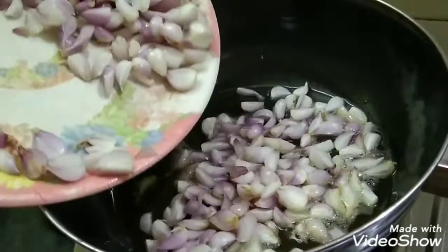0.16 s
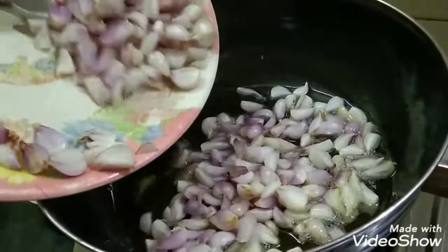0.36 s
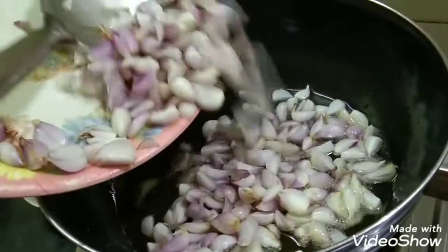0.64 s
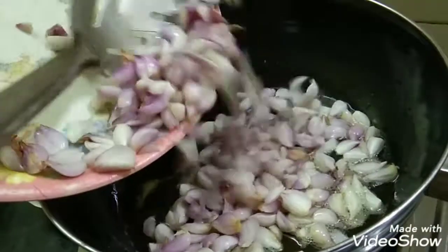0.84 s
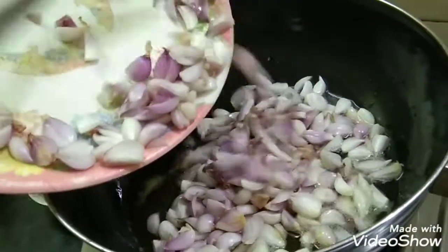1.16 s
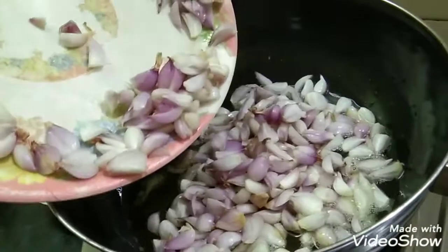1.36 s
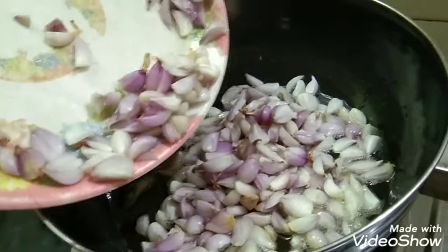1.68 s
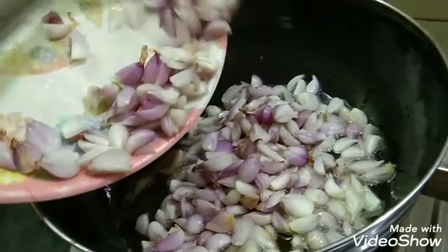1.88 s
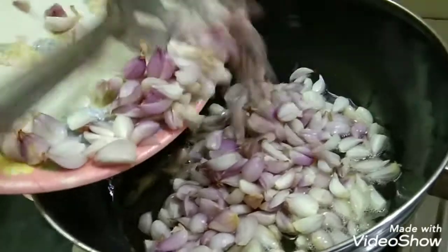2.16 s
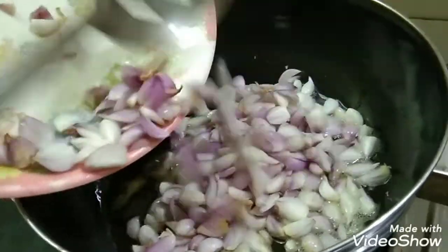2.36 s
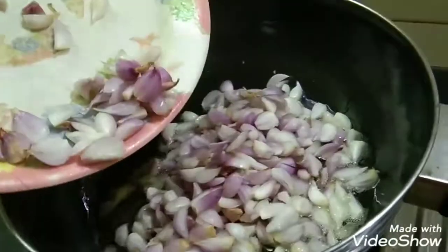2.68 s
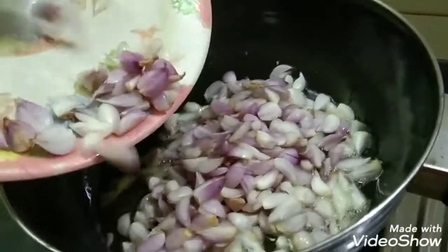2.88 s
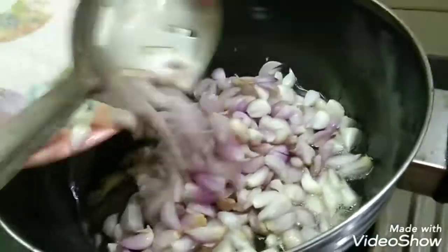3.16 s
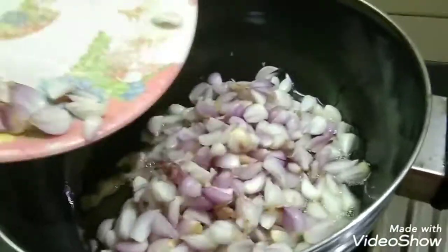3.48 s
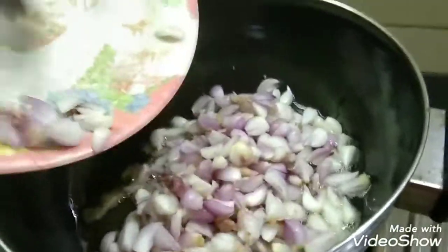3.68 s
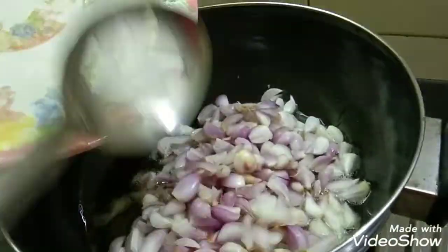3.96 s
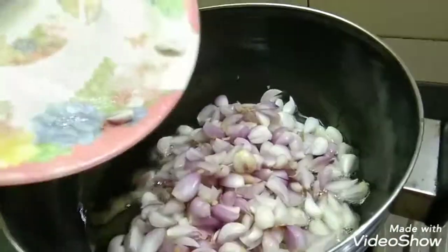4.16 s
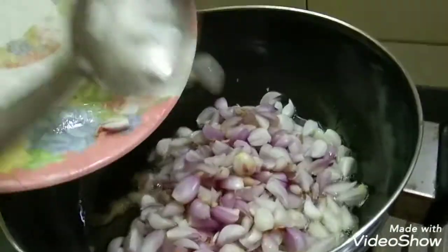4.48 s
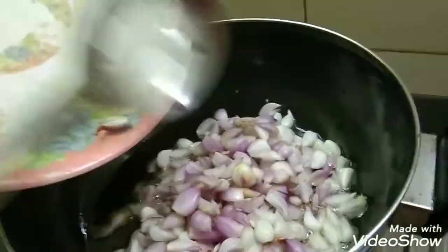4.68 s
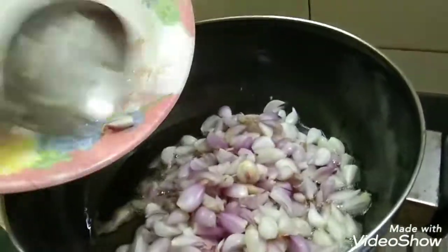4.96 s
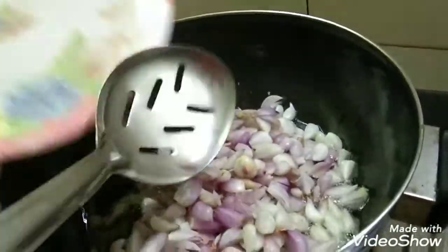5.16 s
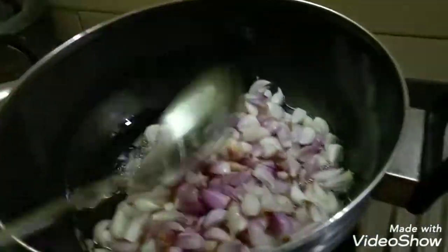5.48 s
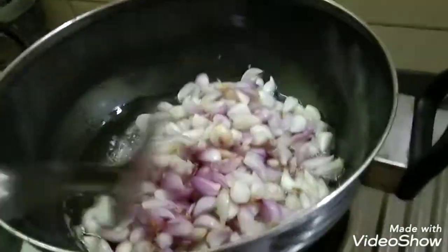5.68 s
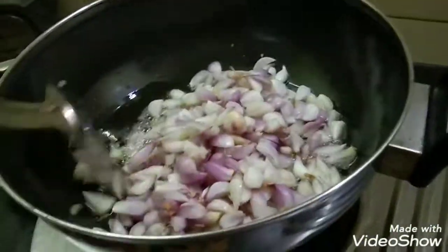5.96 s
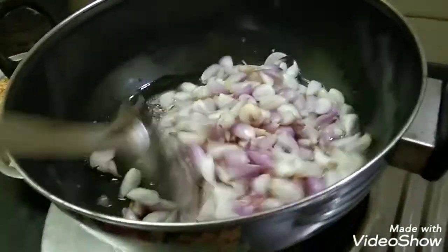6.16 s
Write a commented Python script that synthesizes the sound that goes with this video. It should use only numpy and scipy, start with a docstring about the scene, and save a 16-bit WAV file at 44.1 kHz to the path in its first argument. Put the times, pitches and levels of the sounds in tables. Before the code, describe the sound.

Hot oil crackles and snaps loudly, then gradually cools to a softer fizz. Over it come short rough scrapes and hard ringing knocks of a metal spoon on a plate, and soft wet thuds of falling onions. Near six seconds the spoon hits the wok with bright metallic rings and grinds along the bottom. Close phone pickup in a lightly reverberant kitchen with a low burner rush.

```python
"""Onions in hot oil

Chopped onions sizzle, spit and slowly calm in a wok: filtered crackle, ringing bubbles and short pops.
A steel spoon knocks (ringing modes) and scrapes (rough friction) more onions off a plate in a kitchen.
Onion pieces patter as dull clusters of contacts; at the end the spoon hits the wok and starts to stir.
A burner's rush and a faint handling rumble lie underneath, and a phone's limiter holds the peaks."""
import sys
import numpy as np
from scipy import signal
from scipy.fft import rfft, irfft, next_fast_len
from scipy.io import wavfile
from scipy.ndimage import uniform_filter1d, minimum_filter1d, map_coordinates

SR = 44100
rng = np.random.default_rng(int(sys.argv[2]) if len(sys.argv) > 2 else 0)


def dump_mix(stems):
    """Bounce the given channels to the path in sys.argv[1] as a 16-bit WAV at rate SR."""
    frames = np.atleast_2d(stems).T  # one column per channel
    limited = np.clip(frames, -1, 1)  # hard clip at full scale
    pcm = np.round(limited * 32767).astype(np.int16)
    wavfile.write(sys.argv[1], SR, pcm)


N = 278712
TIME = np.arange(N) / SR
RING_TIME = np.arange(SR // 2) / SR

# Levels in the tables are fader settings: the layers trim them further in the mix.
# Set bursts of steam, and at 4.417 s a pop-like tick, probably of the spoon:
# t/s, peak level/dB, ringing f/Hz, splash level against the peak/dB
POP_EVENTS = [(0.04, -3, 5460, -11), (0.0624, -9, 6740, -26), (0.0715, -5, 6600, -26),
              (0.0977, -7.5, 6720, -21), (0.19, -11.5, 4700, -11), (0.2489, -4, 5700, -22),
              (0.2609, -12, 5460, -9), (0.2768, -7.5, 6250, 0), (0.471, -9.5, 6640, -24),
              (0.5432, -1.5, 5360, -33), (0.6716, -8, 2980, -8), (0.7753, -10, 6640, -16),
              (0.9583, -8.5, 6170, -23), (1.1322, -12, 6640, -29), (1.234, -11.5, 6800, -21),
              (1.288, -9.5, 6400, -6), (1.3149, -10, 6830, -26), (1.5534, -9, 7200, -22),
              (1.9189, -1.5, 5970, -20), (2.1264, -7.5, 6800, -34), (2.3321, -13, 4480, -28),
              (2.6231, -11, 5740, -19), (2.7197, -11, 7030, -43), (2.7886, -12, 6700, -27),
              (2.816, -7.5, 6600, -23), (3.2188, -7, 6700, -33), (3.3219, -9.5, 6460, -17),
              (3.3841, -6.5, 6250, -11.5), (3.496, -14.5, 6500, -37), (3.91, -14, 6250, -36),
              (4.1857, -12, 6350, 2), (4.4173, -8.5, 6130, 8), (5.1639, -15.5, 6640, -39),
              (5.3662, -21, 6430, -22)]
# Spoon strikes on the plate: t/s, clash level/dB, spoon ring level/dB, plate ring level/dB,
# thump level/dB, place (0 middle, 1 rim), chatter/s, clash t60/s
PLATE_KNOCKS = [(1.573, -19.5, -34, -26.5, -28, 1, .001, 0.053),
                (2.771, -21, -25.5, -24.5, -27, 0.28, .002, 0.12),
                (3.038, -38, -30, -44, -48, 0.38, 0.012, 0.062),
                (3.581, -16.5, -29.5, -20.5, -18.5, 0.96, 0.011, 0.075),
                (4.302, -20.5, -32, -20.5, -40, .05, 0.016, 0.078),
                (4.497, -14.5, -23, -46, -49, 0.87, 0.0043, 0.061),
                (4.919, -22, -42, -28.5, -25, 0.86, .003, 0.034)]
# Spoon slides over the plate: start t/s, length/s, rub level/dB, plate ring level/dB, squeal level/dB
PLATE_SCRAPES = [(0.477, 0.055, -25.5, -33, -42), (1.647, 0.16, -31, -42.5, -38),
                 (1.692, 0.045, -40.5, -44.5, -31.5), (2.145, 0.028, -24, -50, -40),
                 (2.821, 0.16, -36.5, -46, -46), (3.034, 0.058, -28.5, -60, -31),
                 (3.769, 0.02, -29.5, -44, -50), (3.819, 0.025, -26, -47, -36),
                 (4.38, 0.12, -38.5, -54, -51), (5.007, 0.018, -28, -30, -38),
                 (5.038, 0.061, -29, -59, -41)]
# Onion pieces landing or tumbling on the heap: start t/s, length/s, level/dB, f/Hz
ONION_LANDINGS = [(0.686, 0.062, -43.5, 737), (0.793, 0.14, -48.5, 755), (1.0, .25, -58, 370),
                  (1.419, 0.014, -35.5, 826), (1.658, 0.013, -39.5, 860), (2.153, 0.083, -54.5, 695),
                  (5.806, 0.031, -39.5, 630), (6.099, 0.29, -44.5, 786)]
# Spoon blows on the wok: t/s, clash level/dB, ring level/dB, thump level/dB, chatter/s
WOK_HITS = [(5.813, -32.5, -32, -44, 0.0046), (5.871, -19.5, -18.5, -50, 0.026),
            (6.305, -31.5, -29.5, -24, 0.014)]
# Loudness curve of the spoon pushing through the wok: t/s, level/dB
STIR_LEVELS = [(5.97, -11), (5.982, -33), (5.992, -29), (6.044, -24.5), (6.14, -29.5), (6.32, -28)]
# Modes of the undamped plate: f/Hz, t60/s, level struck in the middle/dB, level struck at the rim/dB
PLATE_MODES = [(321, 0.26, -2.5, -9), (364, 0.32, -6.5, -10), (402.4, 0.36, -19, -13.5),
               (496, 0.21, -12.5, -11), (578, 0.1, -18, -7), (705, 0.17, -2, -15), (761, 0.2, -3, -9),
               (894, 0.18, -6, -15), (1076, 0.25, -18, -6), (1175, 0.17, -15, -11), (1427, 0.076, -3, -5),
               (1663, 0.19, -32, -5.5), (1795, 0.1, -9, 2), (1910, 0.1, 4.5, -4), (1952, 0.13, -31, 5),
               (2155, 0.078, -29, 3), (2276, 0.06, 1, 3), (2550, 0.032, 9, -16), (3050, 0.058, -35, 11.5),
               (3355, 0.09, 5, -23), (3670, 0.093, -50, 4), (4500, 0.15, -29, -20), (4414, 0.1, -14, 3.5)]
# Modes of the steel spoon: f/Hz, t60/s, level/dB
SPOON_MODES = [(286, .2, -11), (1945, .15, -16), (3402, .16, -7), (3470, .15, -11), (6083, .22, -5),
               (6578, .22, -2), (6725, .16, -2), (6800, .16, -3), (7117, .2, -7), (7347, .22, -1),
               (7865, .2, -11), (8520, .15, -27)]
# Modes of the wok: f/Hz, t60/s, level/dB
WOK_MODES = [(379, 0.22, -10), (443.3, 0.61, -17), (560, 0.11, -12), (760, .12, -11), (883, 0.15, -10),
             (2060, .15, -14), (2900, .05, -19), (3265, 0.036, 2), (4240, 0.087, -10), (4820, .1, -2),
             (5390, 0.14, -2.5), (6080, 0.17, 2.5), (6300, 0.16, 2.5), (6800, .15, -0.5), (6540, 0.11, 2.5),
             (7360, 0.18, -0.5)]
# Colour of the sizzling oil: f/Hz, level/dB
SIZZLE_COLOUR = [(710, -22.5), (1200, -22.5), (1490, -21.5), (2180, -11.5), (2400, -13.5), (2890, -1),
                 (3950, -9), (4550, -9.5), (5020, -3.5), (6800, 2.5), (7250, -1), (9210, -25),
                 (12100, -35.5), (14800, -29), (16000, -26)]
# Colour of the splash under a pop: f/Hz, level/dB
SPLASH_COLOUR = [(200, -38), (1600, -22), (2500, -4), (3000, 0), (4000, -1), (5500, -3), (7500, -16),
                 (9000, -36), (15000, -55)]
# Colour of the broad early crackle, low bubbling and crisp top: f/Hz, level/dB
HOT_CRACKLE_COLOUR = [(200, -9), (400, 3), (900, 6.5), (2500, -14), (9000, 6.5), (15000, -6.5)]
# Colour of the burner and room: f/Hz, level/dB
KITCHEN_COLOUR = [(47, -46), (80, -7.5), (186, -11), (236, -5), (264, -9), (303, 1), (343, -13),
                  (383, -3.5), (492, -18), (573, -8.5), (2200, -14.5), (2860, -47), (4840, -120)]
# Colour of the handling rumble: f/Hz, level/dB
RUMBLE_COLOUR = [(15, -29), (35, -22), (58, -3), (85, -16), (160, -19), (500, -56)]
# Colour of the spoon's rub on the plate: f/Hz, level/dB
RASP_COLOUR = [(30, -60), (100, -14.5), (400, -14.5), (1100, -10.5), (1900, -10.5), (2800, -1),
               (4200, -8.5), (6500, 8.5), (7600, 4), (9000, -14.5), (12000, -23.5), (15500, -24)]
# Colour of a steel clash: f/Hz, level/dB
CLASH_COLOUR = [(30, -56), (100, -30), (300, -16), (600, -15.5), (1100, -14), (2200, -12.5), (3000, -4),
                (4200, -9), (5500, -1.5), (6700, 3.5), (7500, 1), (8500, -12.5), (10000, -21.5),
                (12500, -29), (15500, -24)]
# Colour of the dull push in a blow: f/Hz, level/dB
THUMP_COLOUR = [(25, -55), (50, -30), (130, 1.5), (220, 0), (420, 10), (900, -19), (3000, -67)]
# Colour of the spoon grinding in the wok: f/Hz, level/dB
STIR_COLOUR = [(88, -51), (150, -26), (286, -4), (321, -21), (422, -11), (662, -14), (888, -4), (1480, -23),
               (1630, -9.5), (2500, -12), (3220, -4), (3920, -11), (6140, 0.5), (7320, -1), (16000, -70)]
# Reverberation of the walls: f/Hz, t60/s
WALL_DECAY = [(200, 0.33), (1400, 0.47), (4000, 0.31), (10000, 0.32)]

# the cold onions cool the oil, so the sizzle sinks steadily from its first reference level
FRYING_DB, COOLING_DB_PER_S = -31.5, 1.27
# fresh onions reach the oil and the sizzle flares: start, time to its height, height
FLARE_S, FLARE_RISE_S, FLARE_DB = 1, 0.17, 1
# chance bursts: how slowly they thin out, mean setting over the sizzle reference, mean pitch
SPIT_THINNING_S, SPIT_OVER_DB, SPIT_HZ = 4.5, 13, 6440
# fizz after a pop: first level against its peak, decay, fall in that level over the scene
SPRAY_DB, SPRAY_T60_S, SPRAY_FALL_DB_PER_S = -18.5, 0.1, 5.5
# broad crackle of the hot oil: first level against the sizzle reference, fall against it
HOT_CRACKLE_DB, HOT_CRACKLE_FALL_DB_PER_S = -19, 2.7
# rumble of the hand that holds the phone, and its growth as the spoon reaches the wok
HANDLING_DB, STIR_SHAKE_DB = -70.5, 10
# the spoon's ring against the rub; it rings more freely as the onions leave the plate
SPOON_RING_DB, FREEING_DB_PER_S = -19, 3.33
SQUEAL_HZ = 3402
PLATE_DAMPING = 0.86  # share of its free ringing time left by the hand and the onions
LOW_CUT_HZ, TOP_HZ = 42, 15700  # band kept by the microphone and phone


def amp(db):
    """Turn dB into gain."""
    return 10 ** (np.asarray(db) / 20)


def unit(x):
    """Bring x to rms 1."""
    return x / np.sqrt(np.mean(x ** 2) + 1e-20)


def along(points, hz):
    """Read (f/Hz, value) points along a log frequency axis."""
    f, v = np.transpose(points)
    return np.interp(np.log(hz + 1), np.log(f + 1), v)


def curve(rows):
    """Draw (t/s, value) rows as one value per sample."""
    return np.interp(TIME, *np.transpose(rows))


def wobble(rate):
    """A smooth random curve with rate knots a second."""
    return map_coordinates(rng.standard_normal(int(N * rate / SR) + 4), [TIME * rate])


def add(track, s, sound):
    """Mix a sound into the track from time s."""
    start = max(round(s * SR), 0)
    part = track[start:start + len(sound)]
    part += sound[:len(part)]


def coloured(x, spectrum, size=4096):
    """Shape x with a minimum-phase filter of energy 1 that follows the spectrum."""
    cepstrum = irfft(np.log(amp(along(spectrum, np.fft.rfftfreq(size, 1 / SR))) + 1e-6))
    cepstrum[1:size // 2] *= 2  # fold the cepstrum forward so the response is causal
    cepstrum[size // 2 + 1:] = 0
    response = irfft(np.exp(rfft(cepstrum)))
    return signal.fftconvolve(x, response / np.linalg.norm(response))[:len(x)]


def crackle(rate, spread_db, size=N):
    """Random impulses, rate a second on average, of widely different strengths and rms 1 overall."""
    chance, strength = rng.random(size), rng.standard_normal(size)
    size_of_tick = amp(spread_db * np.minimum(strength, 2.5))
    return unit((chance < rate / SR) * size_of_tick * rng.choice([-1, 1], size))


def patchy(x, depth_db):
    """Give x soft random patches of gain in pitch and time."""
    z = signal.stft(x, nperseg=256)[2]
    field = uniform_filter1d(rng.standard_normal(z.shape), size=7, axis=0)
    field = uniform_filter1d(field, size=12, axis=1)
    return unit(signal.istft(z * amp(depth_db * unit(field)), nperseg=256)[1][:len(x)])


def frying(s):
    """Reference level of the sizzle in dB: a steady fall as the oil cools, and one flare."""
    age = np.maximum(s - FLARE_S, 0) / FLARE_RISE_S
    return FRYING_DB - COOLING_DB_PER_S * s + FLARE_DB * age * np.exp(1 - age)


def fizz():
    """Countless tiny steam bubbles merge into a restless hiss."""
    hiss = patchy(coloured(crackle(14000, 3.2), SIZZLE_COLOUR), depth_db=1)
    flutter_db = 1.2 * wobble(25)
    return amp(frying(TIME) - 3 + flutter_db) * hiss


def bubbles(spread_db, cycles, count):
    """Larger bubbles tick out of the hiss, each a short ring at its own pitch."""
    t = RING_TIME[:SR // 200]
    when, size, strength = rng.random((count, 3)).T[:, :, None]
    grid = np.arange(2600, 8500, 50)
    share = np.cumsum(amp(1.72 * along(SIZZLE_COLOUR, grid)))
    hz = np.interp(size, share / share[-1], grid)  # bubbles crowd where the hiss is strongest
    age = t * hz / cycles
    gain = hz * amp(spread_db * -np.log(np.maximum(strength, 1 / 60)))  # few are strong, most weak
    waves = gain * np.sin(2 * np.pi * hz * t) * age * np.exp(-age)
    index = (when * N).astype(int) + np.arange(len(t))
    ticks = np.bincount(index.ravel(), waves.ravel(), N)[:N]
    return amp(frying(TIME) - 4.5) * unit(ticks)


def rolled_off(x, edge_hz):
    """A steep low-pass dulls the top of the bubbles and pops."""
    return signal.sosfilt(signal.butter(N=6, Wn=edge_hz, fs=SR, output="sos"), x)


def hot_crackle():
    """Broad crackle of the hot oil, low bubbling and crisp top, which fades faster than the main sizzle."""
    level_db = frying(TIME) + HOT_CRACKLE_DB - HOT_CRACKLE_FALL_DB_PER_S * TIME
    return amp(level_db) * unit(coloured(crackle(2500, 4), HOT_CRACKLE_COLOUR))


def kitchen():
    """The low rush of the burner and the room: coloured noise that wavers gently."""
    rush = unit(coloured(rng.standard_normal(N), KITCHEN_COLOUR))
    return amp(-51 + 1.0 * wobble(4.6)) * rush


def handling():
    """A faint rumble comes through the phone's case, swelling as the spoon reaches the wok."""
    stirs = np.clip((TIME - WOK_HITS[0][0]) / 0.11 + 1, 0, 1)
    level_db = HANDLING_DB + STIR_SHAKE_DB * stirs + 1.5 * wobble(9.1)
    return amp(level_db) * unit(coloured(rng.standard_normal(N), RUMBLE_COLOUR))


def spits(count):
    """Chance bursts in the columns of POP_EVENTS; they thin out and weaken as the oil cools."""
    when, size, pitch, splash = rng.random((count, 4)).T
    share = (np.arange(count) + when) / count
    s = -SPIT_THINNING_S * np.log(1 - share * (1 - np.exp(-TIME[-1] / SPIT_THINNING_S)))
    peak_db = frying(s) + SPIT_OVER_DB + 7 * (size - .5)
    hz = SPIT_HZ * (1 + .25 * (pitch - .5))
    return np.transpose([s, peak_db, hz, -12 - 19 * splash])


def tear(t, t60):
    """A decaying puff of noise with energy 1."""
    return unit(rng.standard_normal(len(t)) * amp(-60 * t / t60)) / np.sqrt(len(t))


def pops():
    """Each pop, mostly a bursting water drop, is a brief cavity ring, a splash, a snap and a spray of fizz."""
    track, t = np.zeros(N), RING_TIME[:SR // 8]
    for s, db, hz, splash_db in [*POP_EVENTS, *spits(count=26)]:
        age = t * hz / 1.57
        cavity = rolled_off(np.sin(2 * np.pi * hz * t) * age * np.exp(1 - age), edge_hz=8300)
        splash = coloured(tear(t, 0.0016), SPLASH_COLOUR)
        snap = coloured(tear(t, 0.002), SIZZLE_COLOUR)
        burst = amp(-3.5) * cavity + amp(splash_db + 13.5) * splash + amp(-2.0) * snap
        spray = coloured(crackle(3000, 11, size=len(t)), SIZZLE_COLOUR) * amp(-60 * t / SPRAY_T60_S)
        spray_gain = amp(SPRAY_DB - SPRAY_FALL_DB_PER_S * s)
        pop = burst / np.abs(burst).max() + spray_gain * spray
        add(track, s + .0006, amp(db - 0.5) * pop)
    return track


def ring(modes, scatter_db):
    """Decaying (f/Hz, t60/s, level/dB) modes with new strengths for each blow."""
    hz, t60, db = np.transpose(modes)[:, :, None]
    gain = amp(db + scatter_db * rng.standard_normal(hz.shape))
    onset = 1 - np.exp(-RING_TIME * hz / .5)  # time constant of half a cycle
    tone = np.sin(2 * np.pi * (hz * RING_TIME + rng.random(hz.shape)))
    waves = tone * onset * amp(-60 * RING_TIME / t60)
    return np.sqrt(2) * (gain * waves).sum(0) / np.linalg.norm(gain)


def plate_modes(place):
    """Where the plate is hit decides which of its damped modes answer."""
    share = np.clip(place, 0, 1)
    return [(hz, PLATE_DAMPING * t60, middle + share * (rim - middle))
            for hz, t60, middle, rim in PLATE_MODES]


def rubbed(force, modes):
    """A rough force keeps modes ringing while the contact damps them."""
    response = ring(modes, scatter_db=3.0) * amp(-150 * RING_TIME)
    return signal.fftconvolve(force, response / np.linalg.norm(response))[:len(force)]


def swell(length):
    """A stroke rises and fades over length seconds."""
    return np.sqrt(np.abs(np.sin(np.pi * np.minimum(RING_TIME / length, 1))))


def stroke(length, rate, spread_db):
    """Tiny contacts under one stroke, whose length sets their total energy."""
    shape = swell(length)
    contacts = unit(shape * crackle(rate, spread_db, size=len(RING_TIME)))
    return contacts * np.sqrt(np.mean(shape ** 2))


def scrapes():
    """The spoon's edge sticks and slips over the plate: rough rub, ringing bodies and a fitful squeal."""
    track = np.zeros(N)
    for s, length, rub_db, plate_db, squeal_db in PLATE_SCRAPES:
        force = stroke(length, rate=9000, spread_db=-1.5)
        drift = np.cumsum(0.035 * rng.standard_normal(len(RING_TIME)))  # phase wander in radians
        fits = unit(amp(2.5 * wobble(77)[:len(RING_TIME)]))
        tone = np.sin(2 * np.pi * SQUEAL_HZ * RING_TIME + drift)
        squeal = np.sqrt(2) * swell(length) * fits * tone
        spoon_db = rub_db + SPOON_RING_DB + FREEING_DB_PER_S * s
        spoon = amp(spoon_db) * rubbed(force, SPOON_MODES)
        plate = amp(plate_db) * rubbed(force, plate_modes(0.95))
        rub = amp(rub_db) * coloured(force, RASP_COLOUR)
        add(track, s, rub + spoon + plate + amp(squeal_db) * squeal)
    return track


def landings():
    """Soft wet pieces patter dully on the heap: sparse contacts through a low, narrow colour."""
    track = np.zeros(N)
    for s, length, db, hz in ONION_LANDINGS:
        thud = [(hz / 4, -25), (hz * 0.86, -10), (hz, 0), (hz * 1.23, -14), (hz * 4, -40), (hz * 10, -70)]
        add(track, s, amp(db) * coloured(stroke(length, rate=970, spread_db=6.5), thud))
    return track


def clash(chatter, t60, bite_db):
    """Steel bites, chatters on the surface for a moment, then its dense high modes die away."""
    body = amp(-60 * np.maximum(RING_TIME - chatter, 0) / t60)
    bite = amp(bite_db - 60 * RING_TIME / 0.007)
    return coloured((body + bite) * crackle(9000, 1.8, size=len(RING_TIME)), CLASH_COLOUR)


def thump():
    """The dull push of a blow, heard through the whole body: a low decaying noise."""
    push = rng.standard_normal(len(RING_TIME)) * amp(-60 * RING_TIME / 0.11)
    return coloured(push, THUMP_COLOUR) * amp(-14.5)


def knocks():
    """The spoon comes down on the plate and the modes of both ring under the clash."""
    track = np.zeros(N)
    for s, clash_db, spoon_db, plate_db, thump_db, place, chatter, t60 in PLATE_KNOCKS:
        spoon = amp(spoon_db + 6) * ring(SPOON_MODES, scatter_db=-2.0)
        plate = amp(plate_db + 4.5) * ring(plate_modes(place), scatter_db=3.0)
        strike = amp(clash_db) * clash(chatter, t60, bite_db=6)
        add(track, s, strike + spoon + plate + amp(thump_db) * thump())
    return track


def stirring():
    """The spoon skids into the wok, then grinds along its oily bottom, pushing onions ahead of it."""
    track = np.zeros(N)
    for s, clash_db, ring_db, thump_db, chatter in WOK_HITS:
        contacts = crackle(6000, 2.1, size=len(RING_TIME)) * (RING_TIME < chatter)
        skid = rubbed(contacts, WOK_MODES)
        metal = amp(0.5) * ring(WOK_MODES, scatter_db=-0.5) + skid
        strike = amp(clash_db) * clash(chatter, t60=0.1, bite_db=-12)
        add(track, s, strike + amp(ring_db) * metal + amp(thump_db) * thump())
    contact = np.clip((TIME - 5.99) / .04, 0, 1)  # the grind fades in
    level_db = curve(STIR_LEVELS) + 0.47 * wobble(35)
    force = patchy(crackle(4000, 2.6), depth_db=1.0) * amp(level_db) * contact
    return track + amp(-5.0) * coloured(force, STIR_COLOUR) + amp(-8.5) * rubbed(force, WOK_MODES)


def room(x, wok_db, tail_db):
    """The wok's sides throw the sound back at once; the tiled walls follow with a short tail."""
    hz, t, z = signal.stft(rng.standard_normal(SR // 2), SR, nperseg=256)
    decay = amp(-60 * t / along(WALL_DECAY, hz)[:, None])
    tail = signal.istft(z * decay, SR, nperseg=256)[1][:SR // 2]
    tail = tail * (RING_TIME > .005)
    near = rng.standard_normal(SR // 2) * amp(-60 * RING_TIME / 0.016) * (RING_TIME > .0008)
    response = amp(wok_db) * near / np.linalg.norm(near) + amp(tail_db) * tail / np.linalg.norm(tail)
    return x + signal.fftconvolve(x, response)[:N]


def scene():
    """Mix the frying oil and the spoon work, with their reflections, over the low floor."""
    ticking = rolled_off(bubbles(spread_db=7.0, cycles=1.3, count=5000), edge_hz=7400)
    oil = fizz() + room(ticking + pops(), wok_db=-4.0, tail_db=-8)
    tools = room(scrapes() + landings() + knocks() + stirring(), wok_db=-16.0, tail_db=-5.5)
    return (oil + hot_crackle() + kitchen() + handling() + tools)[None]


def record(dry):
    """The microphone thins the deep bass, the phone's limiter holds the peaks, and the top is cut."""
    low_cut = signal.butter(N=2, Wn=LOW_CUT_HZ, btype="high", fs=SR, output="sos")
    heard = signal.sosfilt(low_cut, dry)
    needed = np.minimum(1, .76 / (np.abs(heard) + 1e-9))
    gain = uniform_filter1d(minimum_filter1d(needed, size=81), size=61)  # smooth, with look-ahead
    size = next_fast_len(N + SR // 2)
    kept = np.fft.rfftfreq(size, 1 / SR) < TOP_HZ
    return irfft(rfft(heard * gain, size) * kept, size)[..., :N]


dry = scene()
out = record(dry)
dump_mix(out)
```